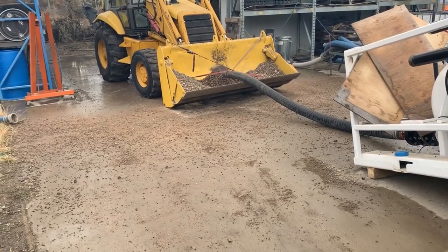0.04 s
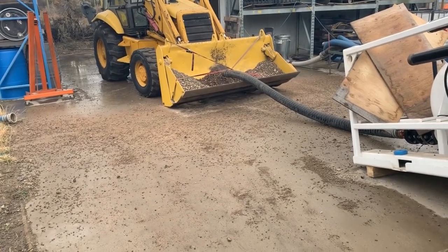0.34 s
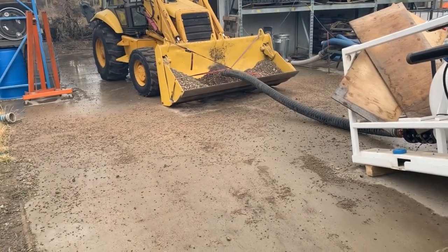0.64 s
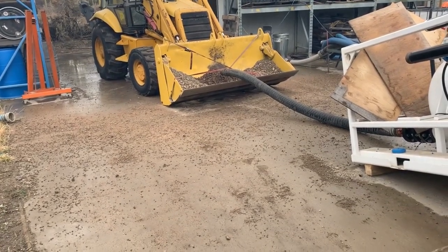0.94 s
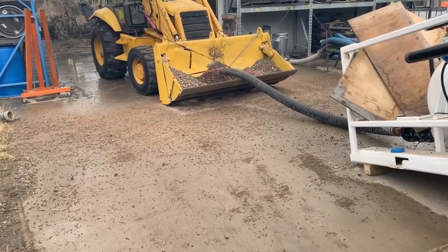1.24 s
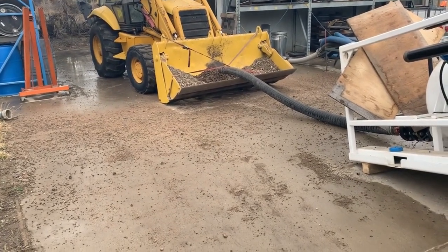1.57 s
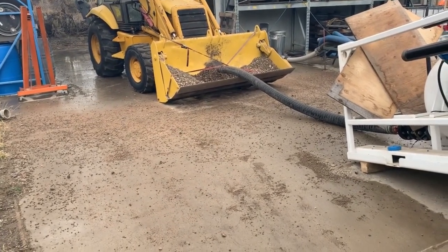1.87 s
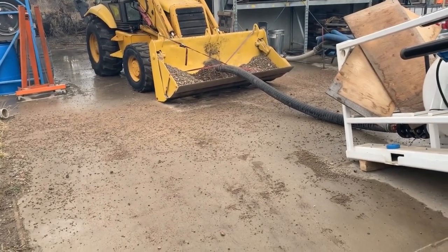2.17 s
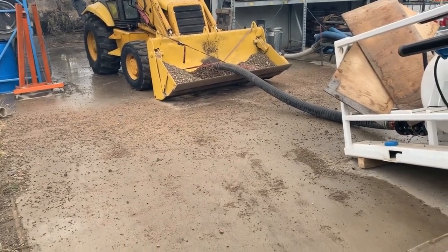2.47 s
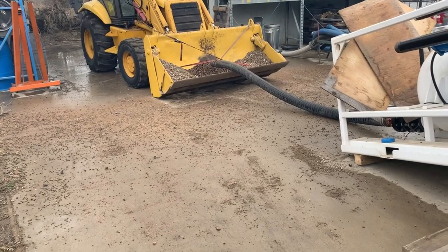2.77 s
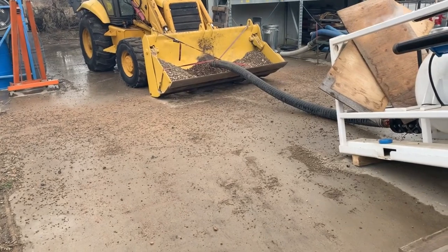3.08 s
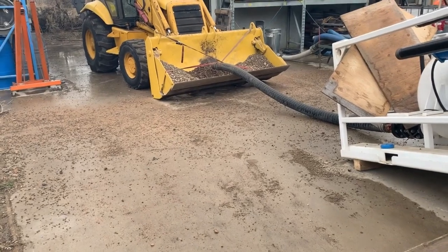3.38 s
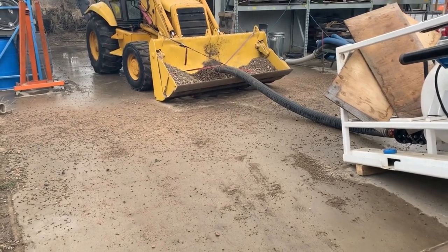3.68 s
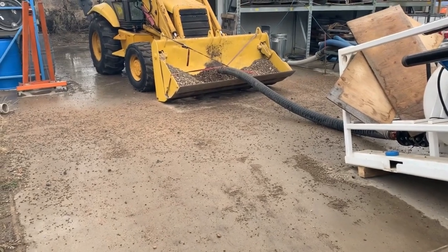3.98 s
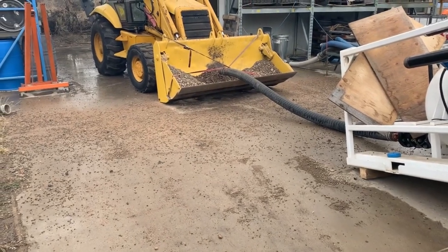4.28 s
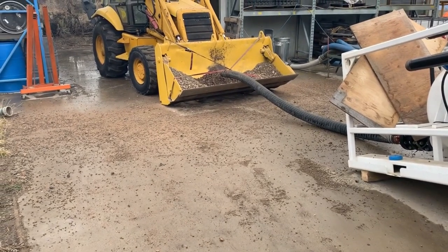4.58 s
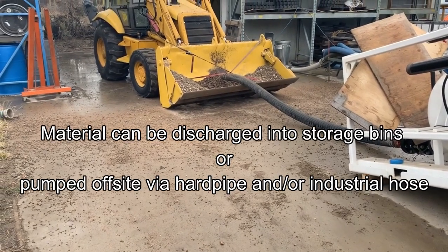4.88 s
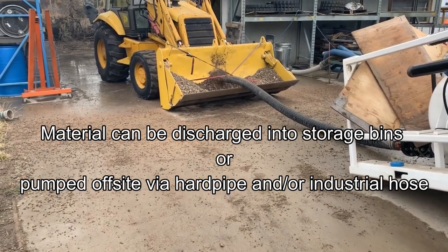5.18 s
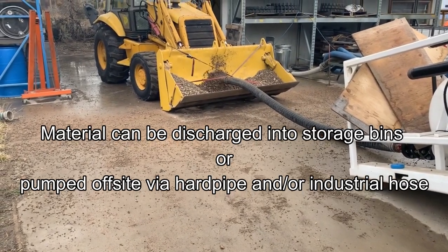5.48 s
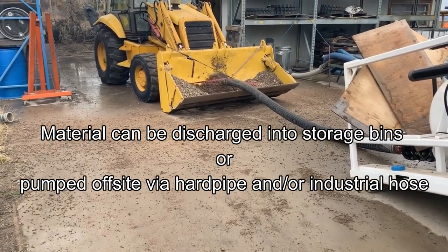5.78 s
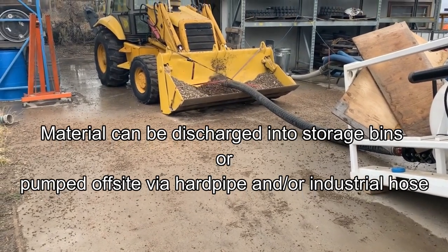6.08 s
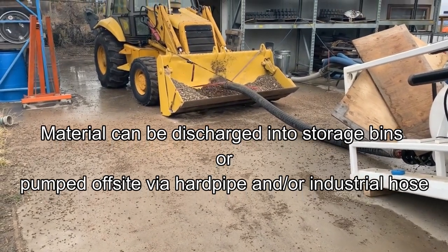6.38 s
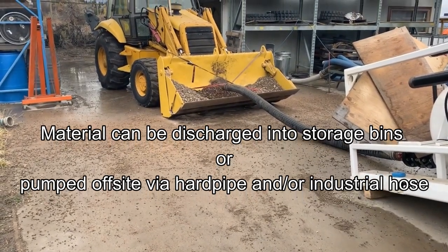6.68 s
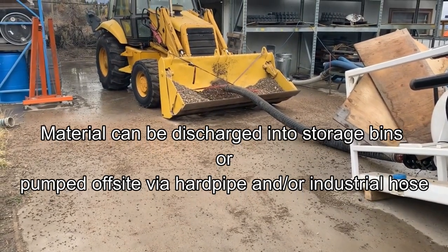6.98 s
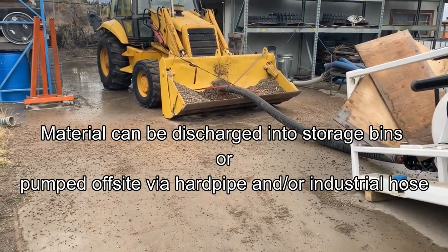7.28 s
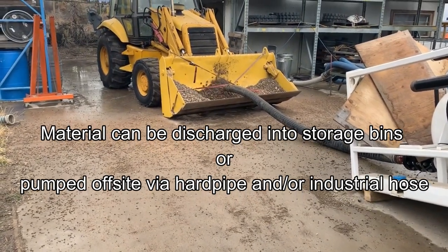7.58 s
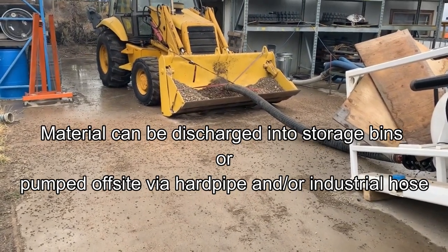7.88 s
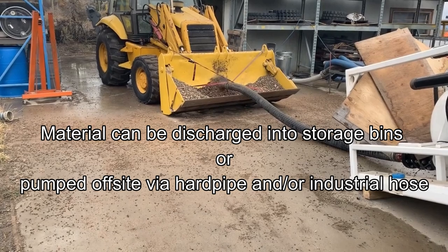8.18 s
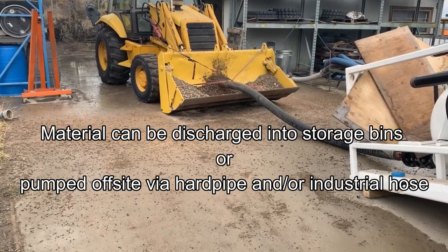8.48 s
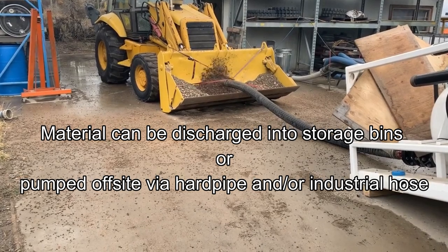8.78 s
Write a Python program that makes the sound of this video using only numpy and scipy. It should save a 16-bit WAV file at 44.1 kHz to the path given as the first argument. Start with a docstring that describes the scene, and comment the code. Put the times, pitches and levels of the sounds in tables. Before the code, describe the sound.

Loud hissing air and rattling gravel rush through a hose outdoors, the nozzle whistling briefly and the hose thumping as it chokes. The roar cuts off abruptly about a third of the way in. A diesel engine and pump keep humming, low at first, their notes beating as the speed rises and falls. The machines grow louder and more clattery, with airy surges and three dull knocks. The microphone stays in one position in the yard.

```python
"""Air roars in a long hose, stones rush along its wall and a jet hisses: a vacuum pump sucks gravel in
an open yard. Slugs of gravel choke the air, the nozzle whistles, the hose thumps. After three seconds
the roar stops dead and leaves the drone of a diesel engine and the pump, whose notes beat against each
other as the speed swings. Their clatter and a thin hiss of air build up, with a few gulps of air in
the hose and knocks on the casing."""
import sys
import numpy as np
from scipy import signal
from scipy.fft import rfft, irfft, next_fast_len
from scipy.io import wavfile
from scipy.ndimage import uniform_filter1d

SR = 44100
rng = np.random.default_rng(int(sys.argv[2]) if len(sys.argv) > 2 else 0)


def transcribe(u):
    """Save the signal u as a 16-bit wav file named by the first command-line argument.

    u: samples, shape (n,) or (channels, n), limited to [-1, 1]; the rate is SR.
    q: integer samples, one column per channel.
    """
    v = np.clip(np.atleast_2d(u).T, -1, 1)
    q = np.round(v * 32767).astype(np.int16)
    wavfile.write(sys.argv[1], SR, q)


N = 389844
TIME = np.arange(N) / SR
SIZE = next_fast_len(N)
HZ = np.maximum(np.arange(SIZE // 2 + 1) * SR / SIZE, 1)
HOSE_LAG_MS, MACHINE_LAG_MS, JET_LAG_MS = .1, .392, .26  # left behind right

# gravel in the hose: time_s, fill (0 open, about 1 packed)
HOSE_FILL = [(0, 0.59), (.15, 0.64), (.7, 0.016), (1.1, 0.11), (1.24, 0.68), (1.6, 1.03), (2.0, 1.31),
             (2.55, 1.3), (2.85, 0.23)]
# hose resonances: centre_hz, width_hz, lift_db
HOSE_MODES = [(415, 200, 9), (676, 110, 11.5), (778, 76, 8.5), (1125, 285, 11.5), (1392, 123, 9),
              (1777, 210, 7), (2100, 100, 4), (2800, 82, 7.5), (3600, 230, 2), (4300, 110, 5)]
# casing resonances: centre_hz, width_hz, lift_db
CASING_MODES = [(366, 18, 6.5), (420, 9, 5), (646, 22, 6.5), (802, 25, 4), (980, 25, 2), (1158, 52, 6.2),
                (1345, 45, 5.2), (1875, 55, 3), (2425, 130, 3), (4850, 400, 2)]
# machines' growing loudness: time_s, gain_db
SWELL = [(0, -23), (2.9, 1.5), (3.8, 0.9), (5.4, 7), (6.8, 10.5), (7.9, 15), (8.7, 19.5)]
# left-right likeness of the suction: freq_hz, direct_share
ROAR_LIKENESS = [(60, .78), (300, .86), (700, .8), (1500, .72), (2400, .66), (4000, .45), (8000, .88),
                 (15000, .85)]
# left-right likeness of the drone: freq_hz, direct_share
DRONE_LIKENESS = [(60, .95), (300, .88), (700, .74), (1400, .78), (3000, .66), (4000, .74), (7000, .8),
                  (15000, .8)]


def from_db(db):
    """Decibels to gain."""
    return 10 ** (np.asarray(db) / 20)


def rms_one(x):
    """Scale the mean of the channels to rms 1."""
    return x / np.sqrt(np.mean(np.atleast_2d(x).mean(axis=0) ** 2) + 1e-20)


def in_time(points):
    """A (time_s, value) curve at every sample."""
    return np.interp(TIME, *np.transpose(points))


def at_hz(points):
    """A (freq_hz, value) curve at every bin, joined in log frequency."""
    hz, value = np.transpose(points)
    return np.interp(np.log(HZ), np.log(hz), value)


def hump(centre_s, length_s):
    """Smooth rise and fall, 0-1."""
    return np.cos(np.pi * np.clip((TIME - centre_s) / length_s, -.5, .5)) ** 2


def resonance_db(modes, hz=HZ):
    """Summed lift of bell-shaped resonances."""
    return sum(db / (1 + (2 * (hz - centre) / width) ** 2) for centre, width, db in modes)


def band(low_hz, high_hz, order=8):
    """Gain of a Butterworth band."""
    return ((1 + (low_hz / HZ) ** (2 * order)) * (1 + (HZ / high_hz) ** (2 * order))) ** -.5


def filtered(x, edges_hz, kind):
    """Causal Butterworth filter, order 2."""
    return signal.sosfilt(signal.butter(2, edges_hz, kind, fs=SR, output="sos"), x)


def drift(rate_hz):
    """Slow random wander, rms 1."""
    step, settle = 40, 2000
    pole = np.exp(-2 * np.pi * rate_hz * step / SR)
    noise = rng.standard_normal(N // step + settle + 2)
    slow = signal.lfilter([1], [1, -2 * pole, pole * pole], noise)[settle:]
    return np.interp(np.arange(N) / step, np.arange(len(slow)), rms_one(slow))


def turbulence():
    """White noise."""
    return rng.standard_normal(N)


def impacts(per_s, spread_db):
    """Hits of uneven size at random moments, rms 1."""
    sizes = from_db(spread_db * np.minimum(rng.exponential(1, N), 4)) * rng.choice([-1, 1], N)
    return rms_one(sizes * (rng.random(N) < per_s / SR))


def radiate(level_db, force, colour, lag_ms, likeness):
    """A coloured force in stereo: direct path, later on the left, plus scatter from the yard."""
    share = np.clip(at_hz(likeness), 0, .9)
    direct = rfft(force, SIZE) * np.exp(-1j * np.pi * HZ * lag_ms / 1000 * np.array([[1], [-1]]))
    envelope = np.sqrt(uniform_filter1d(force ** 2, size=200).clip(0))
    scatter = rfft(rng.standard_normal((2, N)) * envelope, SIZE)
    spectrum = colour * (np.sqrt(share) * direct + np.sqrt(1 - share) * scatter)
    return from_db(level_db) * rms_one(irfft(spectrum, SIZE)[:, :N])


def slugs(edge_s=.072):
    """Strength of the gravel slug rushing up the hose and choking the air."""
    # start_s, end_s, strength
    passages = [(0.92, 1.04, 0.17), (1.298, 1.45, 0.83), (1.458, 1.744, 0.32), (1.773, 1.884, 0.24),
                (1.978, 2.37, 0.74), (2.386, 2.652, 1.0), (2.69, 2.845, 1)]
    return sum(strength * np.clip(np.minimum(TIME - start_s, end_s - TIME) / edge_s + .5, 0, 1)
               for start_s, end_s, strength in passages)


def suction(surge_db=.66):
    """Air booms in the hose modes, gravel peppers the wall, the jet hisses; all surge together."""
    # air spectrum: freq_hz, gain_db
    air_colour = [(205, -14.5), (305, -7.5), (555, -11), (910, -6), (1560, 2), (2080, 7.5), (2520, 9),
                  (3220, 5), (4850, 8), (5900, 4.5), (7350, 9.5), (8650, -6), (12100, -5.5), (14400, -7)]
    # response to load, rows hollow, roar, rush, jet: open_db, per_fill_db, per_slug_db
    load_law = [(-30.5, 6, -3.5), (-22, -0.16, -4), (-28, 0.54, 3.7), (-17, -3, 0)]
    fill, slug = in_time(HOSE_FILL), slugs()
    levels_db = np.array([db + fill_db * fill + slug_db * slug for db, fill_db, slug_db in load_law])
    hollow_db, roar_db, rush_db, jet_db = levels_db + surge_db * drift(27)
    colour = from_db(at_hz(air_colour) + resonance_db(HOSE_MODES))
    hose_path, jet_path = (HOSE_LAG_MS, ROAR_LIKENESS), (JET_LAG_MS, ROAR_LIKENESS)
    hollow = radiate(hollow_db, turbulence(), colour * band(220, 900), *hose_path)
    tumbling = impacts(per_s=5500, spread_db=1)
    roar = radiate(roar_db + .84 * drift(12), tumbling, colour * band(900, 2450), *hose_path)
    stones = impacts(per_s=16000, spread_db=-1.5) + from_db(-15) * pebbles()
    rush = radiate(rush_db + 1.5 * drift(10), stones, colour * band(2780, 7200, order=12), *jet_path)
    spray = impacts(per_s=52000, spread_db=7)
    jet = radiate(jet_db + .04 * drift(43), spray, colour * band(8190, 15320, order=40), *jet_path)
    return hollow + roar + rush * from_db([[-.7], [.7]]) + jet


def pebbles(per_pitch_per_s=30, t60_s=.05, low_hz=2500, high_hz=4900, pitches=12):
    """Larger stones clink on the nozzle, each ringing at one pitch."""
    pole, out = from_db(-60 / (t60_s * SR)), np.zeros(N)
    for hz in np.geomspace(low_hz, high_hz, pitches) * rng.uniform(.98, 1.02, pitches):
        hits = np.full(N, 1e-18)
        onsets = rng.integers(0, N, int(per_pitch_per_s * N / SR))
        hits[onsets] = rng.standard_normal(len(onsets))
        out += signal.lfilter([1, 0, -1], [1, -2 * pole * np.cos(2 * np.pi * hz / SR), pole * pole], hits)
    return rms_one(out)


def shudder(open_db=-44.5, per_fill_db=4, per_slug_db=1):
    """The hose shakes with its load."""
    # shake spectrum: freq_hz, gain_db
    shake_colour = [(24, -5), (45, -7.5), (80, -2.5), (130, -3), (220, 0.5)]
    level_db = open_db + per_fill_db * in_time(HOSE_FILL) + per_slug_db * slugs()
    colour = from_db(at_hz(shake_colour)) * band(40, 173, order=4)
    return radiate(level_db, turbulence(), colour, HOSE_LAG_MS, ROAR_LIKENESS)


def engine_state(idle_hz=69.5, full_effort_hz=78.6):
    """Firing rate and effort (0-1) as the engine speeds up and sinks back to idle."""
    # time_s, firing_hz
    engine_speed = [(2.7, 88), (2.95, 93.7), (3.32, 96.8), (3.5, 94.3), (3.66, 89.5), (3.81, 80.5),
                    (4, 75.6), (4.3, 71), (4.8, 70.1), (5.45, 70.6), (5.8, 75.6), (6.1, 78.7), (6.35, 79.8),
                    (6.6, 76), (6.95, 70), (7.3, 69.5), (7.75, 70), (8.1, 75), (8.84, 81.8)]
    firing_hz = in_time(engine_speed)
    return firing_hz, np.clip((firing_hz - idle_hz) / (full_effort_hz - idle_hz), 0, 1)


def exhaust_note(rate_hz, orders, effort, waver_db=2, jitter_turns=.04):
    """One machine's orders; overtones waver, and swell as they cross the silencer's resonances."""
    # centre_hz, width_hz, lift_db
    silencer_modes = [(169, 16, 5), (205, 5, 5), (219, 6, 5), (240, 12, 4), (254, 14, 7)]
    turns, out = np.cumsum(rate_hz) / SR, np.zeros(N)
    jitter = jitter_turns * drift(8.7)
    for multiple, idle_db, effort_db in orders:
        overtone = multiple != 1
        level_db = idle_db + effort_db * effort + resonance_db(silencer_modes, multiple * rate_hz)
        level_db += overtone * waver_db * drift(9.9)
        phase_turns = multiple * turns + overtone * (rng.random() + jitter)
        out += from_db(level_db) * np.cos(2 * np.pi * phase_turns)
    return np.sqrt(2) * out


def machine_hum(swell_cap_db=17):
    """The pump pulls about 10 Hz ahead of the engine, so their hum throbs."""
    # engine tones, half orders from unequal cylinders: firing_multiple, idle_db, effort_lift_db
    engine_orders = [(1, -46.8, 2.0), (1.5, -60, 0), (2, -57.5, -1), (2.5, -63, 0), (3, -68, 3)]
    # pump tones: stroke_multiple, idle_db, effort_lift_db
    pump_orders = [(1, -56.5, 9.5), (2, -62, 0), (2.19, -66, 0), (8 / 3, -61, 0), (3, -68, 0),
                   (4.5, -63, 0)]
    # stroke rate above firing rate: time_s, lead_hz
    pump_lead = [(3.66, .085), (3.81, 8.6), (4.1, 9.2), (5.45, 11.7), (5.8, 9.4), (6.4, 10), (7.05, 9.3),
                 (7.75, 11), (8.2, 8.7)]
    firing_hz, effort = engine_state()
    stroke_hz = firing_hz + in_time(pump_lead)
    engine = exhaust_note(firing_hz, engine_orders, effort)
    pump = exhaust_note(stroke_hz, pump_orders, effort) + pump_booms(stroke_hz)
    hum = from_db(np.minimum(in_time(SWELL), swell_cap_db)) * (engine + pump)
    left = np.interp(TIME - MACHINE_LAG_MS / 1000, TIME, hum)
    return np.array([left, hum]) * from_db([[.3], [-.3]])


def whistles(wobble_hz=14, attack_s=.012):
    """Air squeezing past stones in the nozzle sings in short glides; wide ones squeal."""
    # start_s, end_s, from_hz, to_hz, level_db, width_hz
    glides = [(1.295, 1.42, 3300, 3520, -30.5, 32), (1.405, 1.6, 3590, 3730, -31, 38),
              (2.012, 2.332, 2430, 2510, -27, 130), (2.013, 2.298, 2800, 2740, -29.5, 85),
              (2.17, 2.515, 2790, 2715, -32, 35), (2.393, 2.549, 3810, 3760, -32, 22),
              (2.51, 2.63, 4130, 4040, -31.5, 22), (2.69, 2.8, 4300, 4370, -35, 40),
              (2.752, 2.86, 3510, 3440, -35, 25)]
    out = np.zeros((2, N))
    for start_s, end_s, from_hz, to_hz, level_db, width_hz in glides:
        first, count = round(start_s * SR), round((end_s - start_s) * SR)
        along = np.linspace(0, 1, count)
        wobble = rms_one(uniform_filter1d(rng.standard_normal(count), size=150))
        pitch_hz = from_hz + (to_hz - from_hz) * along + wobble_hz * wobble
        breath = rms_one(filtered(rng.standard_normal((2, count)), width_hz, "low"))
        tone = np.real((breath[0] + 1j * breath[1]) * np.exp(2j * np.pi * np.cumsum(pitch_hz) / SR))
        envelope = np.minimum(along * (end_s - start_s) / attack_s, 1) * np.sqrt(1 - along ** 2)
        out[:, first:first + count] += from_db(level_db) * rms_one(tone) * envelope
    return out


def bucks(low_hz=24, rise_s=.034, decay_s=.058):
    """The hose bucks under the heaviest slugs with deep thumps."""
    # peak_s, level_db, top_hz
    thumps = [(2.12, -40, 65), (2.36, -36, 60), (2.495, -24, 170), (2.61, -31, 75)]
    out = np.zeros(N)
    for peak_s, level_db, top_hz in thumps:
        thump = rms_one(filtered(turbulence(), [low_hz, top_hz], "band"))
        envelope = np.exp(np.minimum((TIME - peak_s) / rise_s, (peak_s - TIME) / decay_s))
        out += from_db(level_db) * thump * envelope
    return out


def surges():
    """Air surges through the pump: hiss lift in dB and pipe ring strength over time."""
    # centre_s, length_s, hiss_lift_db, ring_strength
    air_surges = [(2.99, 0.35, 4, 0.2), (3.47, 0.21, 0, 0.1), (3.854, 1, 2, 0.4), (4.426, 0.46, 3, 0.5),
                  (5.48, 0.77, 3.5, 0), (5.5, 0.11, 3.5, 0), (6.08, 0.68, 3, 0.76), (6.69, 0.72, 1.5, 0.4),
                  (7.38, 1, 3.5, 0.46), (7.842, 1, 2.5, 0.87), (8.6, 0.44, 2, 0.1)]
    return sum(np.outer([lift_db, ring], hump(centre_s, length_s))
               for centre_s, length_s, lift_db, ring in air_surges)


def drone(effort_db=2, pulse_depth=.016, flutter_db=.5, clump_db=1):
    """The frame rumbles; casing clatter and gritty air hiss pulse faintly once a crank turn."""
    # machine spectrum: freq_hz, gain_db
    machine_colour = [(26, -13), (46, -4.5), (112, -4), (192, -1), (288, 3.5), (382, -9.5), (565, -6),
                      (890, -4.5), (1240, -6), (1720, -8), (3500, -12), (5600, -15.5), (7400, -54)]
    # air leak spectrum: freq_hz, gain_db
    leak_colour = [(6000, 2), (6900, 1), (8000, -1.5), (10000, -6.5), (12500, 2), (15500, -6.5)]
    firing_hz, effort = engine_state()
    swell_db = in_time(SWELL)
    surge_db, _ = surges()
    rumble_db = swell_db + effort_db * effort
    hiss_db = swell_db + surge_db + flutter_db * drift(6.5)
    crank = 1 + pulse_depth * np.cos(np.pi * np.cumsum(firing_hz) / SR)
    colour = from_db(at_hz(machine_colour) + resonance_db(CASING_MODES))
    rattle = impacts(per_s=5500, spread_db=2.5) * crank
    grit = impacts(per_s=16000, spread_db=2) * from_db(clump_db * drift(30))
    layers = [(rumble_db - 49.5, turbulence(), band(24, 219)),  # frame
              (rumble_db - 50, turbulence() * crank, band(350, 509)),  # casing
              (swell_db - 51, rattle, band(614, 2220)),
              (hiss_db - 52, turbulence() * crank, band(2450, 5900))]
    body = sum(radiate(level_db, force, colour * passband, MACHINE_LAG_MS, DRONE_LIKENESS)
               for level_db, force, passband in layers)
    leak_gain = from_db(at_hz(leak_colour)) * band(5900, 20000, order=16)
    return body + radiate(hiss_db - 47.5, grit * crank, leak_gain, JET_LAG_MS, DRONE_LIKENESS)


def pipe_ring(centre_hz=4660, width_hz=400, gain_db=-49.5):
    """Some surges ring the air pipe in a high, breathy band."""
    _, strength = surges()
    pipe = band(centre_hz - width_hz / 2, centre_hz + width_hz / 2, order=24)
    return strength * radiate(in_time(SWELL) + gain_db, turbulence(), pipe, MACHINE_LAG_MS, DRONE_LIKENESS)


def pump_booms(stroke_hz):
    """Clean pump overtones stand out briefly, gliding with its speed."""
    # centre_s, length_s, stroke_multiple, gain_db
    booms = [(3.06, .32, 2.17, -48), (3.48, .4, 2.7, -46), (3.53, .36, 2.18, -44.5), (3.72, .3, 2.67, -51),
             (3.87, .22, 2.05, -46), (4.04, .34, 2, -41), (4.45, .7, 2.69, -53), (5.27, .75, 2.67, -48.5),
             (6.22, .4, 4.44, -50), (6.27, .4, 2, -48.5), (6.3, .55, 2.67, -50), (6.44, .3, 2.27, -49),
             (6.62, .45, 2, -42), (6.88, .25, 2, -48), (8.7, .4, 2, -47)]
    turns, out = np.cumsum(stroke_hz) / SR, np.zeros(N)
    for centre_s, length_s, multiple, gain_db in booms:
        tone = np.cos(2 * np.pi * (multiple * turns + rng.random()))
        out += from_db(gain_db) * hump(centre_s, length_s) * tone
    return np.sqrt(2) * out


def gulps():
    """The idle hose draws a little air and briefly roars in its modes."""
    # centre_s, length_s, level_db
    draws = [(3.5, 0.47, -56), (5.54, 0.49, -42.5), (7.405, 0.47, -36.5), (8.522, 0.18, -38)]
    envelope = sum(from_db(level_db) * hump(centre_s, length_s) for centre_s, length_s, level_db in draws)
    colour = from_db(resonance_db(HOSE_MODES)) * band(750, 4200, order=3)
    return envelope * radiate(0, turbulence(), colour, HOSE_LAG_MS, ROAR_LIKENESS)


def knocks(decay_s=.033, gain_db=6.5):
    """Dull knocks on the casing, each spanning an octave either side of its pitch."""
    # start_s, force_db, pitch_hz
    blows = [(4.522, -31, 338), (7.470, -28, 990), (8.501, -21.5, 850)]
    force = np.zeros(N)
    for start_s, force_db, pitch_hz in blows:
        envelope = from_db(force_db) * (TIME >= start_s) * np.exp(-np.abs(TIME - start_s) / decay_s)
        force += filtered(envelope * turbulence(), [pitch_hz / 2, pitch_hz * 2], "band")
    casing = from_db(gain_db + resonance_db(CASING_MODES))
    return irfft(casing * rfft(force, SIZE), SIZE)[:N]


def casing_ring():
    """The casing's middle modes fade in, driven by the machines' shaking."""
    # start_s, rise_s, gain_db
    onset = (6.7, 1.6, -55)
    start_s, rise_s, gain_db = onset
    fade = np.clip((TIME - start_s) / rise_s, 0, 1)
    modes = (from_db(resonance_db(CASING_MODES)) - 1) * band(850, 1370, order=3)
    return fade * radiate(in_time(SWELL) + gain_db, turbulence(), modes, MACHINE_LAG_MS, DRONE_LIKENESS)


def scene(shut_off_s=2.913, split_hz=2300, high_fall_s=.014, low_fall_s=.016, drone_rise_s=.022):
    """The suction dies abruptly, lows last; the machines run on."""
    since_s = np.maximum(TIME - shut_off_s, 0)
    hose = suction() + shudder() + bucks()
    lows = signal.sosfiltfilt(signal.butter(2, split_hz, fs=SR, output="sos"), hose)
    hose = lows * np.exp(-since_s / low_fall_s) + (hose - lows) * np.exp(-since_s / high_fall_s)
    drone_fade = np.clip(since_s / drone_rise_s, 0, 1)
    return (hose + whistles() + drone_fade * drone() + machine_hum()
            + casing_ring() + pipe_ring() + gulps() + knocks())


def record(dry, ceiling=.9, cutoff_hz=15900):
    """Clip the highest peaks; cut subsonics and top treble steeply."""
    clipped = np.clip(dry, -ceiling, ceiling)
    passband = band(12, cutoff_hz, order=60) * (HZ < cutoff_hz + 400)
    return irfft(rfft(clipped, SIZE) * passband, SIZE)[:, :N]


dry = scene()
out = record(dry)
transcribe(out)
```